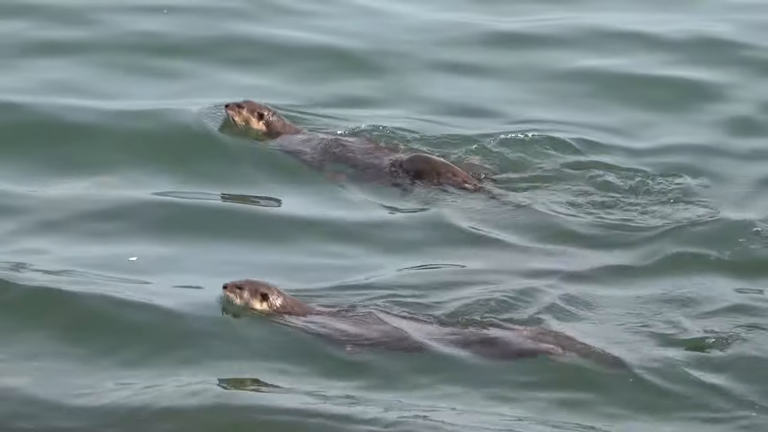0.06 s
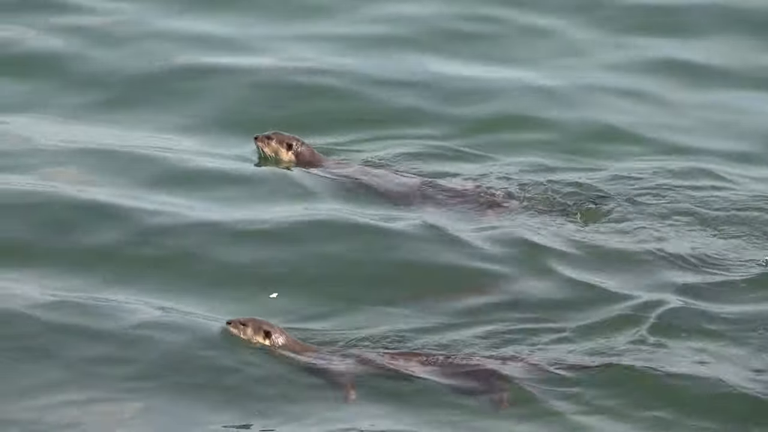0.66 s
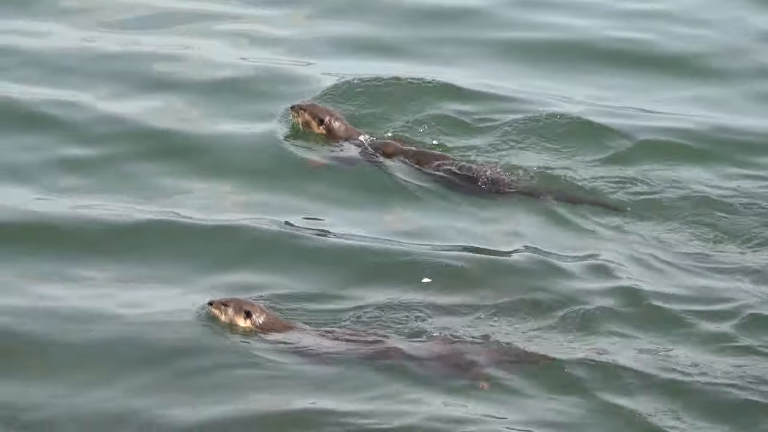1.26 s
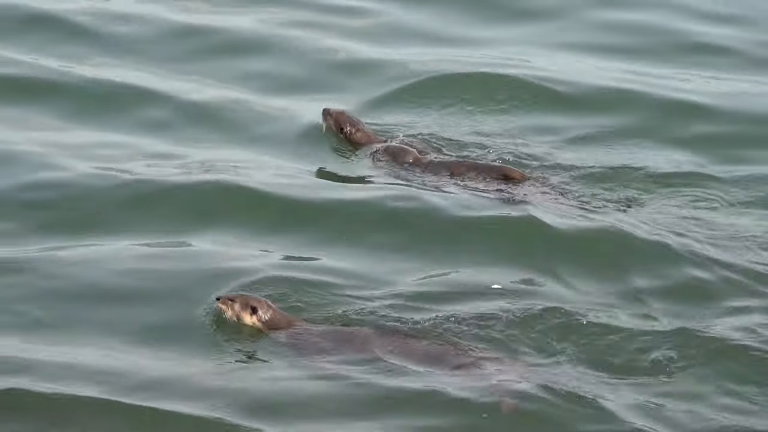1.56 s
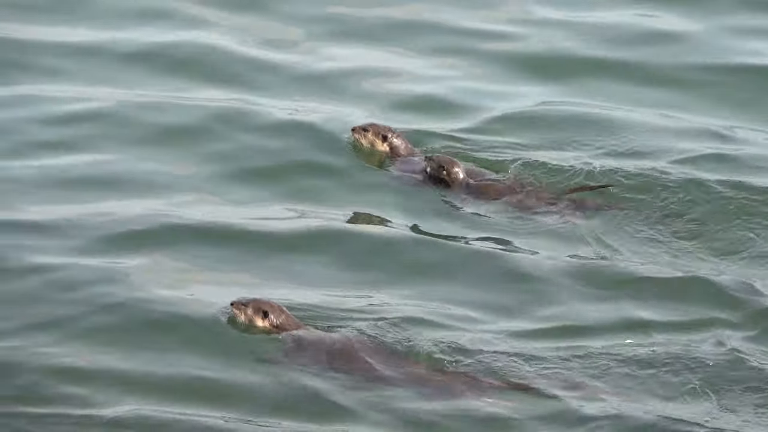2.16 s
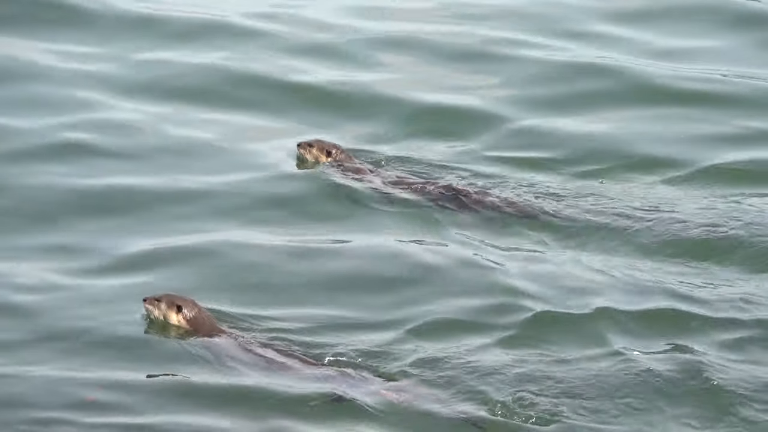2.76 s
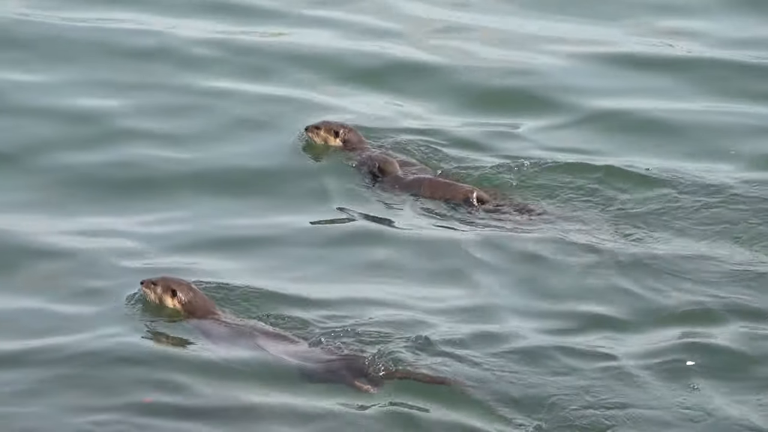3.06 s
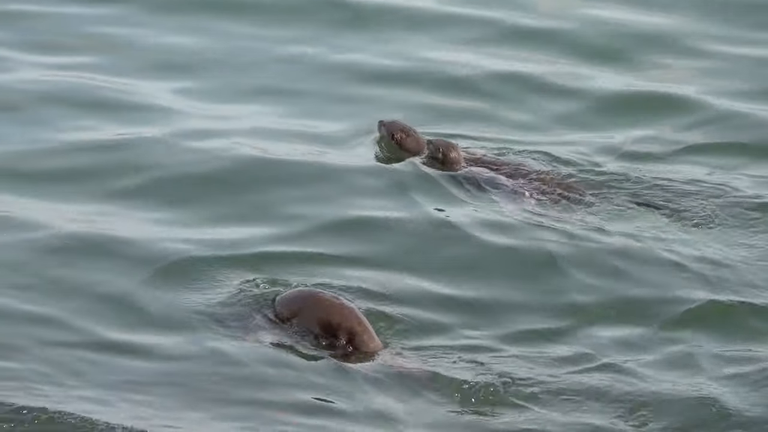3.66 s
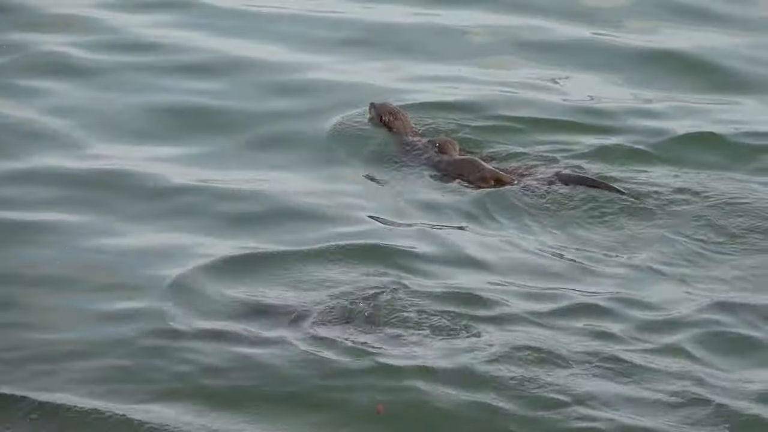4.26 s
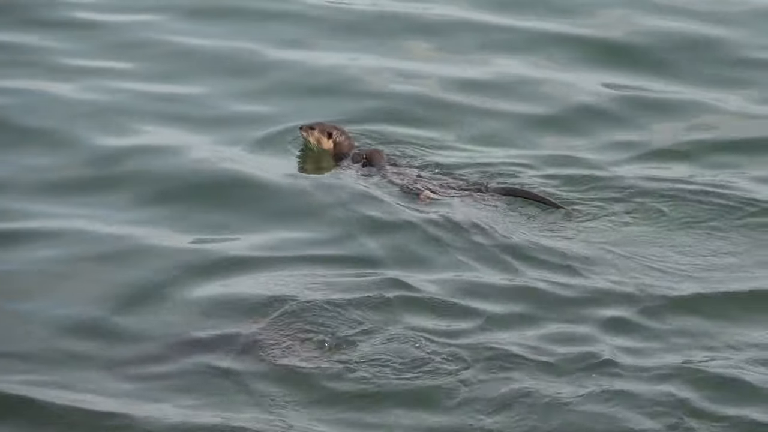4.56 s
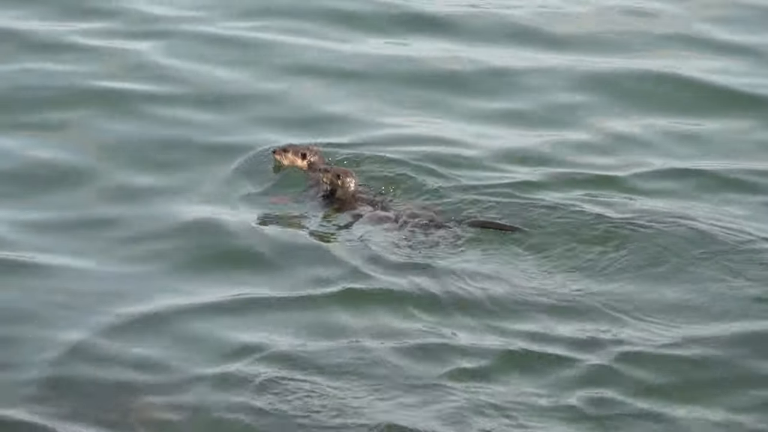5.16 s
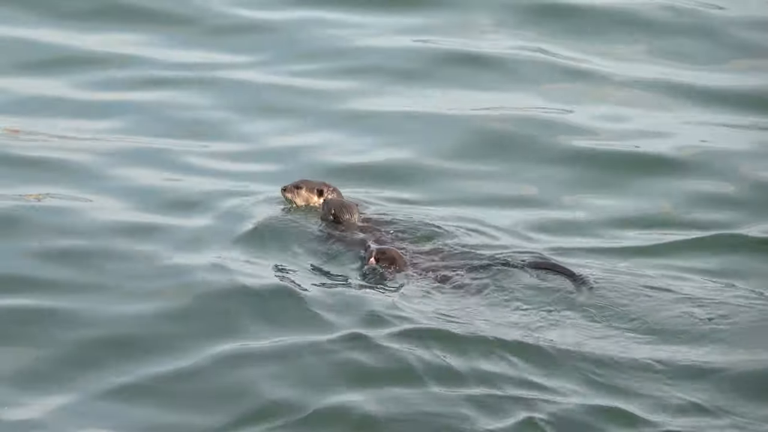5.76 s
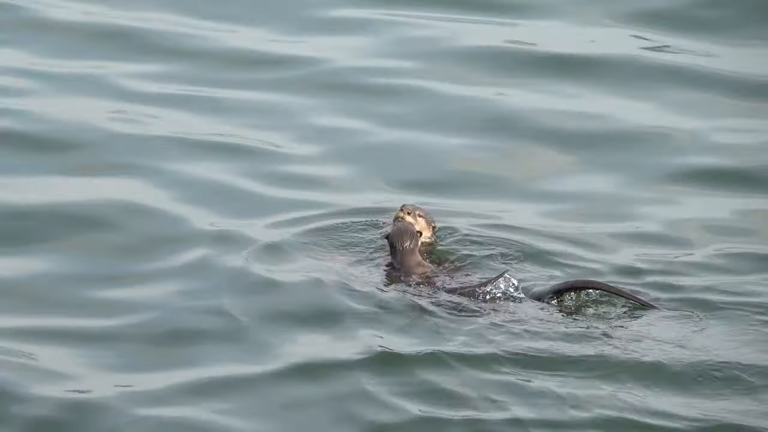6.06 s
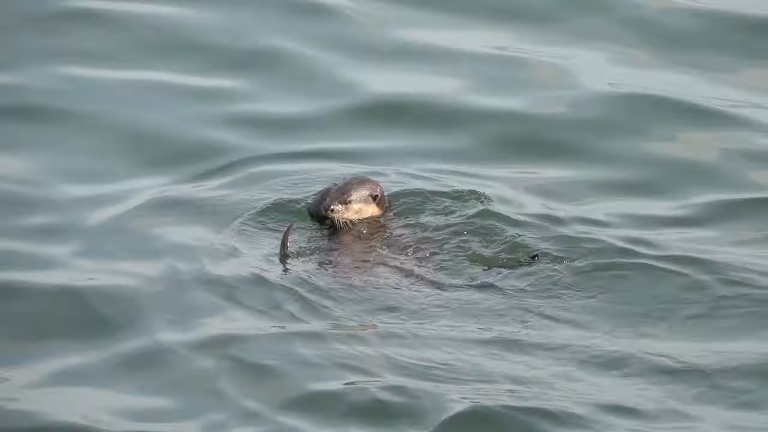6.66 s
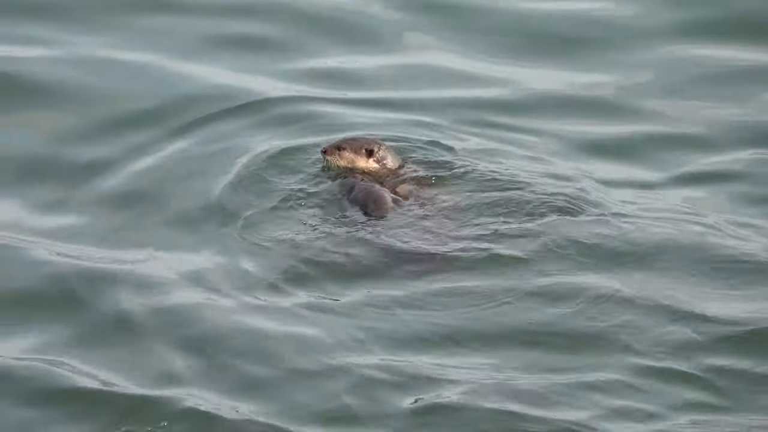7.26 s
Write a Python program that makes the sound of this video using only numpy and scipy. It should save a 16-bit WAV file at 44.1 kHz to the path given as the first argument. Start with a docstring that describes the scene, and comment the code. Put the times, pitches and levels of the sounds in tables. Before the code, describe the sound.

Wind buffets the microphone in low, ragged puffs for the whole seven and a half seconds, over a distant rumble and the wash and light fizz of small waves. Insects shrill very faintly from the bank. From the start, swimming otters a little to the left give short, high, arching squeals that break into a rasp, roughly one every 0.7 seconds until about 3 seconds, with another near 4.4. Purer peeps and thin whistles fall between them, along with soft paddling swishes. From 2.7 seconds, hoarse falling chirps answer from farther off. Near 4.7 seconds a sharp tick sounds close on the right, followed at once by a plop. The water and calls grow quieter between about 5.3 and 6.3 seconds. A second plop comes near 6.5 seconds, and the lapping, peeps and chirps pick up again around 7 seconds.

```python
"""Otters swim across open water, a little left of the microphone. From the start wind buffets it over a
distant rumble, wavelets wash and fizz, and insects shrill faintly from the bank. The otters call in short
arching squeals that break into a rasp, with purer peeps and thin whistles between. From 2.7 s hoarse
chirps answer from farther off. Near 4.7 s come a sharp tick close by and a plop; water and calls then
ease off, and both pick up again around 7 s."""
import sys
import numpy as np
from scipy import signal
from scipy.fft import rfft, irfft, next_fast_len
from scipy.io import wavfile
from scipy.ndimage import uniform_filter1d

SR = 44100
rng = np.random.default_rng(int(sys.argv[2]) if len(sys.argv) > 2 else 0)


def transcribe(signal):
    """Save signal, clipped to [-1, 1], as a 16-bit WAV file at the path in sys.argv[1]."""
    frames = np.atleast_2d(signal).T
    limited = np.clip(frames, -1, 1)
    pcm = np.round(limited * 32767).astype(np.int16)
    wavfile.write(sys.argv[1], SR, pcm)


N = 331191
TIME = np.arange(N) / SR
FREQS = np.maximum(np.fft.rfftfreq(next_fast_len(N), 1 / SR), 1)
PITCH_WAVER = .006  # unsteadiness of a clean tone, as a share of its pitch

# how much the water is stirred: (time [s], level [dB])
WATER_STIR = [(0, -46), (0.15, -48), (0.3, -51.5), (0.5, -50), (0.7, -48.5), (1.5, -49.5), (1.9, -49.5),
              (2.07, -50), (2.4, -49.5), (2.7, -49), (3.5, -50), (4.05, -47.5), (4.3, -49), (4.95, -50.5),
              (5.5, -54), (6.2, -57.5), (6.55, -53.5), (6.85, -48.5), (7.15, -52), (7.51, -49)]
# spectrum of a wavelet: (frequency [Hz], level [dB])
WAVELET_COLOUR = [(700, -6.5), (1400, 5), (2100, 2), (2550, -0.5), (3100, 2.5), (3800, -6), (4800, -12.5),
                  (5700, -21.5), (7500, -24), (10000, -27), (15000, -41.5)]


def from_db(db):
    """Decibels to gain."""
    return 10 ** (np.asarray(db) / 20)


def rms_one(x):
    """Scale to unit power."""
    return x / np.sqrt(np.mean(x ** 2) + 1e-20)


def in_time(curve):
    """A level curve, sample by sample."""
    return np.interp(TIME, *np.transpose(curve))


def swing(curve):
    """A level curve in dB about its own mean."""
    db = in_time(curve)
    return db - db.mean()


def gate(start, end, attack_s, release_s):
    """Rise, hold and die away."""
    return np.exp(-np.maximum(start - TIME, 0) / attack_s - np.maximum(TIME - end, 0) / release_s)


def across_hz(points):
    """A table joined by straight lines over log frequency."""
    hz, value = np.transpose(points)
    return np.interp(np.log(FREQS), np.log(hz), value)


def spectrum_of(x):
    """Padded Fourier transform."""
    return rfft(x, next_fast_len(N))


def wave_of(spectrum):
    """Back to samples."""
    return irfft(spectrum, next_fast_len(N))[..., :N]


def drift(rate):
    """Smooth chance that changes about `rate` times a second; spread 1."""
    return rms_one(wave_of(spectrum_of(rng.standard_normal(N)) / (1 + (FREQS / rate) ** 4)))


def lumpy(rate, depth_db):
    """Two noises that swell and sink together."""
    return rms_one(rng.standard_normal((2, N)) * from_db(depth_db * np.clip(drift(rate), -2, 2)))


def droplets(per_s, spread_db):
    """Random tiny bursts of very uneven size."""
    sizes = from_db(spread_db * np.minimum(rng.exponential(1, N), 4))
    return rms_one((rng.random(N) < per_s / SR) * sizes * rng.standard_normal((2, N)))


def steady(pair, window_s):
    """Even out the slow swells of a noise and keep its fast grain."""
    power = uniform_filter1d(np.mean(pair ** 2, axis=0), int(window_s * SR))
    return pair / np.sqrt(np.maximum(power, 0) + 1e-4)


def ring(clicks, hz, t60):
    """Each click sets a decaying sine ringing."""
    decay, step = from_db(-60 / (t60 * SR)), 2 * np.pi * hz / SR
    return signal.lfilter([0, np.sin(step)], [1, -2 * decay * np.cos(step), decay ** 2], clicks + 1e-18)


def pan(x, left_db):
    """Place a sound between the channels."""
    return x * from_db([[left_db / 2], [-left_db / 2]])


def at_ports(pair, colour_db):
    """Colour two unrelated signals and mix them as two close microphone ports hear a broad source."""
    # how alike the ports sound: (frequency [Hz], likeness [0-1])
    likeness = [(30, .85), (70, .88), (150, .7), (280, .5), (450, .72), (750, .87), (1400, .72), (2500, .5),
                (5000, .35), (9500, .68), (15000, .62)]
    # how far the left port leads: (frequency [Hz], phase [rad])
    left_lead = [(30, .2), (90, .12), (180, .03), (260, .4), (320, 1.1), (420, 1.6), (700, 1.8),
                 (1250, 1.0), (2100, 1.1), (3000, 1.0), (4200, 1.8), (8000, 0)]
    # left minus right: (frequency [Hz], level [dB])
    balance = [(30, -0.5), (250, 0.5), (700, -1.5), (1300, 2.5), (2000, 3), (4300, 2), (6000, 2),
               (8500, -1.5), (13000, 2)]
    mid, side = spectrum_of(pair) * from_db(colour_db)
    alike, sign = across_hz(likeness), np.array([[1], [-1]])
    ports = np.sqrt(1 + alike) * mid + sign * np.sqrt(1 - alike) * side
    ports *= from_db(sign * across_hz(balance) / 2) * np.exp(.5j * sign * across_hz(left_lead))
    return rms_one(wave_of(ports))


def rumble():
    """A smooth rumble in the distance that swells along with the water."""
    # spectrum of the rumble: (frequency [Hz], level [dB])
    colour = [(300, -4.5), (700, 7), (1000, 2.5), (1400, -0.5), (1800, -10), (2150, -8.5), (2500, -29),
              (4000, -36.5), (7000, -39.5), (15000, -60)]
    level_db = -43.5 + .66 * swing(WATER_STIR)
    return from_db(level_db) * at_ports(lumpy(rate=14, depth_db=1.4), across_hz(colour))


def hiss():
    """The faint, steady hiss of open water."""
    # spectrum of the hiss: (frequency [Hz], level [dB])
    colour = [(2000, -1.5), (5800, -1.5), (8000, -5.5), (11000, -15), (15000, -15)]
    return from_db(-81.5) * at_ports(rng.standard_normal((2, N)), across_hz(colour))


def shrill(bands):
    """Noise in narrow resonances, each (frequency [Hz], width [Hz], level [dB])."""
    gain = sum(from_db(db) / (1 + (2 * (FREQS - hz) / width) ** 2) for hz, width, db in bands)
    return at_ports(rng.standard_normal((2, N)), 20 * np.log10(gain))


def far_insects():
    """A chorus far off on the bank merges into steady bands."""
    # resonances of the chorus: (frequency [Hz], width [Hz], level [dB])
    bands = [(6250, 260, -16), (9550, 430, -6), (11720, 150, -19), (12260, 430, -15)]
    # strength of the chorus, lowest near 6.2 s: (time [s], level [dB])
    strength = [(0, -71.5), (2.1, -71.5), (2.7, -70.5), (4.5, -69.5), (5.3, -74.5), (5.97, -72.5),
                (6.04, -75), (6.2, -78), (6.28, -76.5), (7.51, -68)]
    return from_db(in_time(strength) - .6 * drift(4)) * shrill(bands)


def near_insects(hz, width_hz, pulse_hz, swell_db):
    """Nearer insects pulse in phrases that swell and stop short."""
    # trills: (start [s], end [s], final level [dB])
    trills = [(1.152, 1.496, -68.5), (2.7, 3.217, -77), (4.75, 5.042, -68), (5.453, 5.991, -66.5),
              (6.402, 6.934, -63.5)]
    phrases = 0
    for start, end, db in trills:
        remaining = np.clip((end - TIME) / (end - start), 0, 1)
        phrases += from_db(db - swell_db * remaining) * (TIME > start) * (TIME < end)
    phase = 2 * np.pi * np.cumsum(pulse_hz + .5 * drift(2)) / SR
    return phrases * rms_one((1 + np.sin(phase)) ** 2) * shrill([(hz, width_hz, 0)])


def twitter(start, end, hz, throb_hz, db):
    """A thin, high tone throbs quickly, far off to the left."""
    throb = 1 + .5 * np.sin(2 * np.pi * throb_hz * TIME)
    tone = np.sin(2 * np.pi * np.cumsum(hz * (1 + PITCH_WAVER * drift(90))) / SR)
    return pan(from_db(db) * gate(start, end, attack_s=.01, release_s=.03) * throb * tone, left_db=8)


def wavelets():
    """Wavelets lap and drip, louder as the water is stirred."""
    lapping = lumpy(rate=6.6, depth_db=2) + .35 * droplets(per_s=380, spread_db=3.5)
    return from_db(-54.5 + 2.6 * swing(WATER_STIR)) * at_ports(lapping, across_hz(WAVELET_COLOUR))


def fizz():
    """Fine spray bursts on the surface, louder as the water is stirred."""
    # spectrum of the fizz: (frequency [Hz], level [dB])
    colour = [(2500, -13), (4500, 6), (7000, -1.5), (8600, 2.5), (10400, -5), (11200, -4), (14000, 5),
              (16000, -3.5)]
    bursts = lumpy(rate=30, depth_db=4) + .35 * droplets(per_s=250, spread_db=1)
    return from_db(-77 + 1.1 * swing(WATER_STIR)) * at_ports(bursts, across_hz(colour))


def spray():
    """Fine spray falls in brief showers."""
    # showers: (start [s], end [s], level [dB])
    showers = [(-0.05, .18, -57.5), (1.88, 2.023, -64), (3.749, 4.35, -69.5), (3.95, 4.194, -65),
               (4.466, 4.524, -64.5), (6.798, 6.89, -72), (7.362, 7.597, -59.5)]
    # spectrum of the spray: (frequency [Hz], level [dB])
    colour = [(2000, 3), (4500, 3.5), (7000, -4), (8600, 4.5), (10300, 5), (11300, -3.5), (14000, -3),
              (16000, -13)]
    level = sum(from_db(db) * gate(start, end, attack_s=.035, release_s=.037)
                for start, end, db in showers)
    return level * at_ports(lumpy(rate=40, depth_db=2), across_hz(colour))


def swishes():
    """Paddling, a little to the left, stirs up brief clouds of small bubbles of about one size."""
    # strokes: (middle [s], half length [s], pitch [Hz], width [Hz], level [dB])
    strokes = [(0.04, 0.036, 2140, 400, -55), (0.16, .04, 1820, 800, -47), (0.654, 0.07, 1680, 1000, -51.5),
               (0.8, 0.033, 2590, 700, -51), (1.751, 0.028, 1246, 592, -43), (1.907, .04, 2650, 1100, -51),
               (3.153, .04, 1344, 400, -48), (4.049, 0.18, 2215, 498, -55.5),
               (4.884, .08, 2120, 600, -55.5), (5.2, .03, 2210, 700, -60), (5.949, 0.33, 2100, 700, -59),
               (6.273, 0.025, 1684, 1300, -52.5), (7.026, 0.024, 2770, 504, -53)]
    bubbles = steady(lumpy(rate=18, depth_db=5.5) + .5 * droplets(per_s=420, spread_db=6), window_s=.068)
    out = 0
    for s, half_s, hz, width_hz, db in strokes:
        band = signal.butter(2, [hz - width_hz / 2, hz + width_hz / 2], "band", fs=SR, output="sos")
        cloud = rms_one(signal.sosfilt(band, bubbles))
        out += from_db(db) * cloud / (1 + ((TIME - s) / half_s) ** 4)
    return pan(out, left_db=3.5)


def slaps():
    """A wavelet hits and sprays for a few thousandths of a second."""
    # slaps of water: (time [s], level [dB])
    hits = [(4.77, -43), (6.261, -52.5), (6.298, -52), (7.116, -43)]
    level = sum(from_db(db) * gate(s, s, attack_s=.0003, release_s=.0087) for s, db in hits)
    return level * at_ports(rng.standard_normal((2, N)), across_hz(WAVELET_COLOUR))


def plops(t60, rise_per_s, attack_s):
    """Trapped bubbles ring briefly and rise in pitch."""
    # bubbles: (time [s], starting pitch [Hz], level [dB])
    bubbles = [(4.771, 1000, -27), (6.453, 1240, -29), (6.523, 1730, -45)]
    out, age = np.zeros(N), TIME[:SR // 10]
    for s, hz, db in bubbles:
        tone = np.sin(2 * np.pi * hz * age * (1 + rise_per_s * age))
        level = from_db(db - 60 * age / t60) * np.minimum(age / attack_s, 1)
        out[int(s * SR):int(s * SR) + len(age)] += level * tone
    return pan(out, left_db=-2.5)


def ticks():
    """Hard little contacts ring close by on the right."""
    # contacts: (time [s], level [dB])
    contacts = [(0.292, -43), (1.072, -45), (1.955, -46), (4.6723, -26.5), (4.996, -36)]
    # what a contact rings with: (frequency [Hz], level [dB], time to fall 60 dB [s])
    modes = [(2200, -8, 0.01), (3000, -10.5, 0.0098), (4950, -10.5, 0.0075), (6400, -16, 0.0064),
             (8600, -16, .004)]
    clicks = np.zeros(N)
    for s, db in contacts:
        clicks[int(s * SR)] = from_db(db)
    rings = sum((-1) ** k * from_db(db) * ring(clicks, hz, t60) for k, (hz, db, t60) in enumerate(modes))
    return pan(rings, left_db=-6)


def wind():
    """Big eddies buffet the microphone; small ones follow the gusts in ragged bursts."""
    # spectra of the big and the small eddies: (frequency [Hz], level [dB])
    big_colour = [(15, -21), (28, -17), (50, -7.5), (105, -0.5), (190, -3.5), (290, -8.5), (450, -18.5),
                  (800, -50), (1500, -88), (5000, -130)]
    small_colour = [(100, -20), (220, -5.5), (340, -1.5), (520, -6.5), (720, -15.5), (1000, -30.5),
                    (1600, -49.5), (3000, -80.5), (8000, -120)]
    # strength of the low buffeting and of the gusts: (time [s], level [dB])
    buffeting = [(0, -18.5), (0.15, -17.5), (0.5, -20), (0.82, -17), (1.9, -17), (2.4, -19.5),
                 (2.82, -17.5), (3.55, -18), (3.75, -19.5), (4.25, -18.5), (4.65, -17.5), (5.4, -19.5),
                 (5.6, -18.5), (6.4, -16.5), (6.6, -19.5), (7.0, -17), (7.51, -19)]
    gusts = [(0, -23), (0.2, -23.5), (0.6, -30), (1.0, -23), (1.78, -21.5), (2.1, -24), (2.33, -27),
             (2.55, -24.5), (2.7, -28), (3.15, -21), (3.45, -25), (3.73, -28.5), (4.4, -30.5), (5.05, -25),
             (5.17, -31.5), (5.25, -21), (5.48, -40), (5.68, -32.5), (5.95, -23), (6.3, -27), (6.42, -21.5),
             (6.67, -26), (6.8, -20.5), (7.0, -22.5), (7.51, -27.5)]
    big = steady(at_ports(lumpy(rate=22, depth_db=2), across_hz(big_colour)), window_s=.12)
    small = steady(at_ports(lumpy(rate=65, depth_db=5.6), across_hz(small_colour)), window_s=.06)
    return from_db(in_time(buffeting)) * big + from_db(-26.5 + swing(gusts)) * small


def puffs(half_length_s):
    """Single puffs of wind hit the microphone, from dull thumps to bright flutters."""
    # puffs: (time [s], level [dB], brightness [0-1])
    blows = [(0.098, -20, 0.7), (0.165, -25.5, 0.95), (0.34, -15.5, 0.04), (0.914, -21.5, .5),
             (1.04, -18, 0.5), (1.168, -20.5, 1), (1.621, -19.5, 1), (1.707, -16, 0.33), (1.764, -17.5, 1),
             (1.887, -15.5, .4), (2.145, -21, 1), (2.213, -22, 1), (2.462, -18, 0.1), (2.789, -21, 0.12),
             (3.09, -21.5, 0.98), (3.172, -19.5, 1), (3.571, -24, .3), (3.667, -28.5, .5),
             (3.848, -21.5, 0.77), (3.941, -18, 0.03), (4.5, -27, 0.2), (4.566, -26, 0.46),
             (4.774, -20.5, .9), (5.1, -20.5, 0.5), (5.275, -18.5, 0.13), (5.61, -28, 0.13),
             (5.775, -20.5, 0), (6.022, -25.5, 0.1), (6.1, -18, 0.44), (6.405, -19, 0.9),
             (6.527, -19, 0.58), (6.76, -20.5, 0.15), (6.909, -22.5, 0.97), (6.994, -17.5, 0.96),
             (7.241, -20, 1), (7.322, -21, 0.37), (7.463, -21, 0.43)]
    # spectra of the dullest and the brightest puff: (frequency [Hz], level [dB])
    thump_colour = [(80, -17), (170, -6), (270, 0), (380, -5), (520, -17), (800, -33.5), (1500, -61),
                    (5000, -110)]
    flutter_colour = [(100, -19.5), (240, 0), (400, -1), (580, -3.5), (800, -13.5), (1100, -27.5),
                      (1700, -41), (3000, -64), (8000, -110)]
    thump = steady(at_ports(lumpy(rate=41, depth_db=4), across_hz(thump_colour)), window_s=.019)
    flutter = steady(at_ports(lumpy(rate=70, depth_db=9), across_hz(flutter_colour)), window_s=.027)
    out = 0
    for s, db, brightness in blows:
        level = from_db(db) * np.exp(-((TIME - s) / half_length_s) ** 2 / 2)
        out += level * (np.sqrt(1 - brightness) * thump + np.sqrt(brightness) * flutter)
    return out


def scatter(x, near_t60, far_t60, far_db):
    """Ripples smear a call over a few hundredths of a second; the bank adds a faint longer tail."""
    age = TIME[:SR]
    fade = from_db(-60 * age / near_t60) + from_db(far_db - 60 * age / far_t60)
    tail = rng.standard_normal((2, SR)) * fade
    tail /= np.sqrt(np.sum(tail ** 2, axis=1, keepdims=True))
    return signal.fftconvolve(x[None], tail, axes=1)[:, :N]


def call(arch, top_hz, rough, break_at, octave_db, sides, waver, jitter, breaks, air):
    """One arch of pitch as (tone, rasp); a rough voice breaks into side tones and air."""
    mouth_hz, air_db = 3530, 7.6
    progress = np.linspace(0, 1, len(waver))
    start_drop, end_drop, top_at = arch
    rise = np.clip(1 - progress / top_at, 0, 1)
    fall = np.clip((progress - top_at) / (1 - top_at), 0, 1)
    hz = top_hz * (1 - start_drop * rise ** 1.55 - end_drop * fall ** 1.9)
    # the voice frays at the break and partly clears as it falls
    fray = rough * np.clip((progress - break_at) / .15, .15, 1) * (1 - .78 * fall ** 2)
    phase = 2 * np.pi * np.cumsum(hz * (1 + PITCH_WAVER * waver + .048 * fray * jitter)) / SR
    # the octave fades through the call and above the mouth's resonance
    octave = from_db(octave_db - 8 * progress - .07 * np.maximum(hz - mouth_hz, 0))
    flicker = 1 + (.12 + .85 * fray) * breaks
    tone = (1 - .68 * fray) * flicker * (np.sin(phase) + octave * np.sin(2 * phase))
    side_tones = sum(from_db(db) * np.sin(multiple * phase) for multiple, db in sides)
    rasp = side_tones * (.5 + fray) * (1 + .5 * jitter) + fray * from_db(air_db) * air
    attack, release = .2 + .25 * top_at, .25  # shares of the call's length
    swell = np.clip(np.minimum(progress / attack, (1 - progress) / release), 0, 1) ** .7
    return swell * np.array([tone, rasp])


def otters():
    """Calls from the water on the left, direct and scattered; the throat confines the rasp."""
    # loud squeals, hoarse at the crest: (start [s], length [s], top pitch [Hz], level [dB],
    # roughness [0-1], top at [share of length], break at [share of length])
    squeals = [(0.002, .102, 3760, -47.5, .3, .6, .35), (0.301, .108, 3930, -44.2, .7, .55, .32),
               (0.883, .122, 3930, -42.3, .72, .55, .24), (1.528, .127, 3950, -45.3, .8, .6, .33),
               (2.228, .124, 3950, -41.3, .78, .6, .38), (3.01, .122, 3760, -40.5, .5, .68, .62),
               (4.44, .123, 3900, -42.8, .75, .58, .25), (6.308, .138, 3820, -53.5, .75, .65, .12)]
    # level, nearly pure peeps: (start [s], length [s], pitch [Hz], level [dB], droop [share of pitch])
    peeps = [(0.525, 0.118, 3320, -49.5, .005), (1.128, 0.118, 3250, -50, .025),
             (1.783, 0.11, 3180, -54, .025), (1.96, 0.085, 3050, -57.5, .025),
             (2.473, 0.13, 3190, -46, .025), (3.258, 0.13, 3227, -50, .025), (4.763, 0.11, 3320, -59, .025),
             (5.003, 0.1, 3460, -55.5, .015), (5.262, 0.1, 3460, -63.5, .025),
             (5.725, 0.082, 3330, -63, .015), (5.707, 0.085, 4030, -66, .015),
             (6.039, 0.07, 3030, -62.5, .025), (6.575, .112, 3250, -50.5, .06),
             (7.24, 0.12, 3780, -55, .025), (7.435, 0.08, 3484, -44.5, .025)]
    # falling chirps from farther off: (start [s], length [s], pitch [Hz], level [dB], roughness [0-1])
    chirps = [(2.7, .074, 3400, -50.5, .5), (2.928, .072, 3420, -47.5, .35),
              (3.145, .085, 3580, -47.5, .45), (3.392, .072, 3360, -46.5, .45),
              (4.475, .052, 3450, -43, .25), (4.69, .072, 3480, -46, .5), (4.918, .075, 3470, -48.7, .5),
              (5.164, .066, 3420, -49, .32), (5.38, .062, 3260, -54, .35), (6.975, .07, 3070, -53.5, .45),
              (7.208, .068, 3470, -46.5, .3), (7.452, .055, 3400, -46, .45)]
    # thin whistles: (start [s], length [s], top pitch [Hz], level [dB],
    # start below the top [share of pitch], end below the top [share of pitch])
    whistles = [(1.595, 0.076, 4610, -54, 0.066, 0.12), (3.862, 0.094, 4600, -56.5, 0.19, 0.13),
                (4.367, 0.1, 5030, -64, .05, .06), (5.562, 0.1, 4500, -65.5, 0.064, .09),
                (7.235, 0.075, 5270, -63, 0.038, .05), (7.31, 0.12, 5840, -58.5, 0.027, .12)]
    # side tones of a broken voice: (pitch multiple, in a squeal [dB], peep or whistle [dB], chirp [dB])
    side_tones = [(3 / 4, -13, -18, -18), (5 / 4, -11, -9, -19), (3 / 2, -4, 5, -3)]
    # response of throat and mouth: (frequency [Hz], gain [dB])
    throat = [(1500, -36), (2500, -19), (2820, -1.5), (3400, -1), (4000, -1), (4400, -8), (4700, -21),
              (5600, -27), (6600, -21), (7600, -23), (8500, -31), (12000, -33)]
    # places: (left minus right [dB], lag at the right port [samples], scattered power [share])
    squeal_place, peep_place = (9, 3, .14), (4, 4, .2)
    chirp_place, whistle_place = (2.5, 3, .45), (5, 3, .35)
    paths = np.zeros((3, 2, N + SR))  # left, right and scattered, each as (tone, rasp)
    air = signal.sosfilt(signal.butter(4, 7040, fs=SR, output="sos"), rng.standard_normal(N))
    noises = np.pad([drift(90), drift(300), drift(260), air], ((0, 0), (0, SR)), "wrap")
    multiples, squeal_sides, pure_sides, chirp_sides = np.transpose(side_tones)

    def add(place, arch, sides_db, start, length, hz, db, rough, break_at=.12, octave_db=-21):
        """One call reaches the left port, then the right; a share of its power scatters."""
        left_db, lag, scattered = place
        first, last = int(start * SR), int((start + length) * SR)
        sides = zip(multiples, sides_db)
        voice = from_db(db) * call(arch, hz, rough, break_at, octave_db, sides, *noises[:, first:last])
        left, right = np.sqrt(1 - scattered) * rms_one(pan(1, left_db)[:, 0])
        for path, gain, late in zip(paths, (left, right, np.sqrt(scattered)), (0, lag, 0)):
            path[:, first + late:last + late] += gain * voice

    for *row, top_at, break_at in squeals:
        add(squeal_place, (.17, .23, top_at), squeal_sides, *row, break_at=break_at, octave_db=-20)
    for *row, droop in peeps:
        add(peep_place, (.003, droop, .15), pure_sides, *row, rough=.14)
    for row in chirps:
        add(chirp_place, (.008, .15, .15), chirp_sides, *row)
    for *row, start_drop, end_drop in whistles:
        add(whistle_place, (start_drop, end_drop, .3), pure_sides, *row, rough=.17)
    tones, rasps = paths[:, 0, :N], paths[:, 1, :N]
    voices = from_db(4) * (tones + wave_of(spectrum_of(rasps) * from_db(across_hz(throat))))
    return voices[:2] + scatter(voices[2], near_t60=.07, far_t60=1.0, far_db=-14)


def scene():
    """Otters out on the water, insects on the bank, wind right on the microphone."""
    voices = otters()
    distance = rumble()
    water = wavelets() + fizz() + hiss() + spray()
    splashes = swishes() + slaps() + plops(t60=.024, rise_per_s=2.7, attack_s=.001)
    bank = far_insects() + near_insects(hz=9730, width_hz=160, pulse_hz=86.6, swell_db=16)
    bank += twitter(start=3.29, end=3.62, hz=6720, throb_hz=32, db=-75)
    return distance + bank + water + splashes + ticks() + wind() + puffs(half_length_s=.018) + voices


def record(dry):
    """The sound fades in at once; the top is cut steeply."""
    fade_in_s, cutoff_hz = .008, 15700
    lowpass = signal.ellip(12, .1, 80, cutoff_hz, fs=SR, output="sos")
    return signal.sosfilt(lowpass, dry * np.minimum(TIME / fade_in_s, 1))


dry = scene()
out = record(dry)
transcribe(out)
```